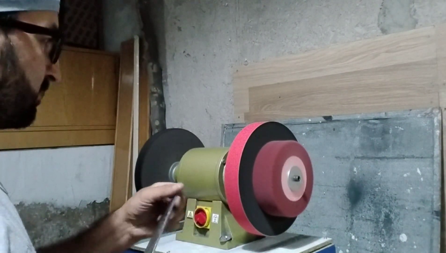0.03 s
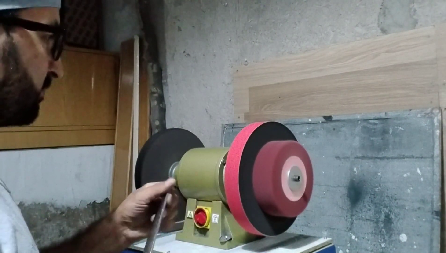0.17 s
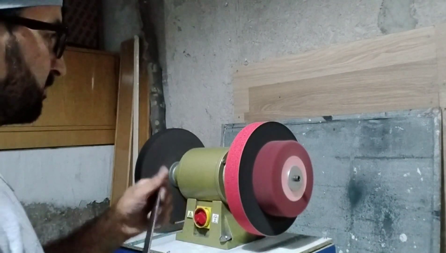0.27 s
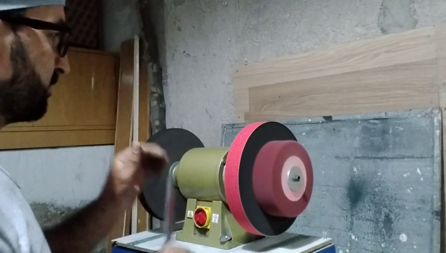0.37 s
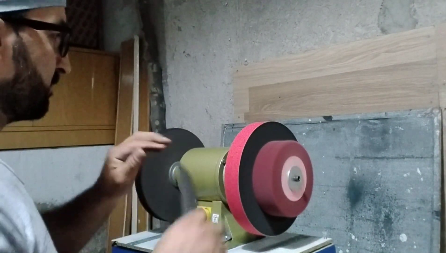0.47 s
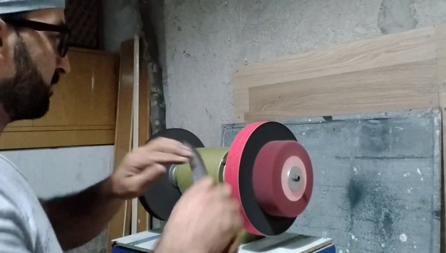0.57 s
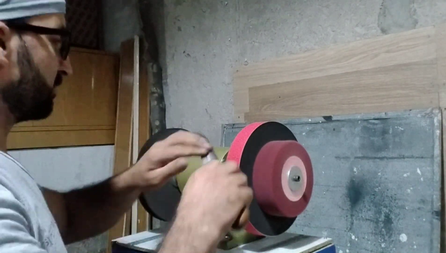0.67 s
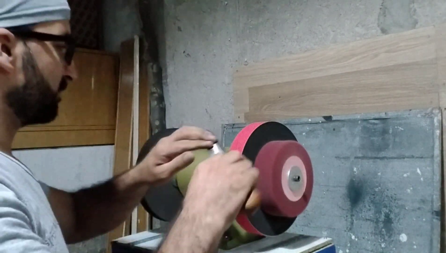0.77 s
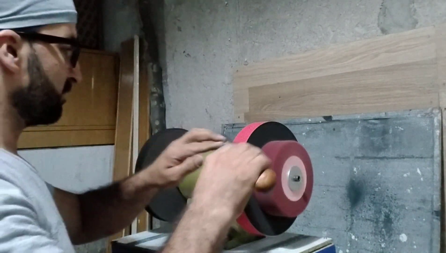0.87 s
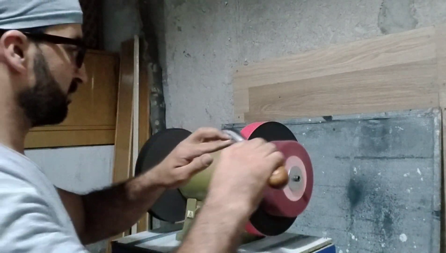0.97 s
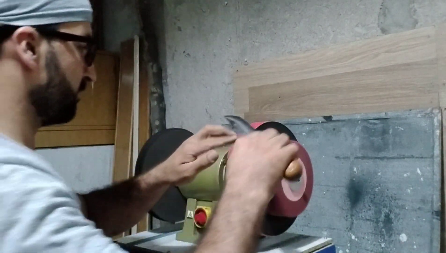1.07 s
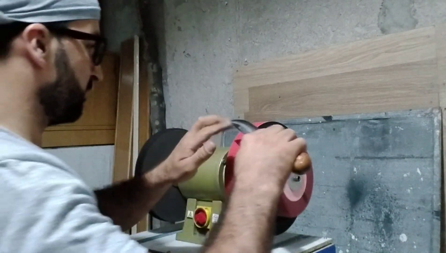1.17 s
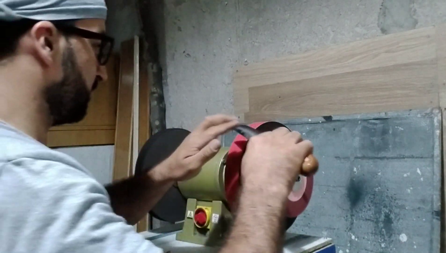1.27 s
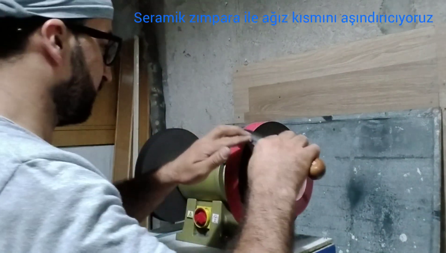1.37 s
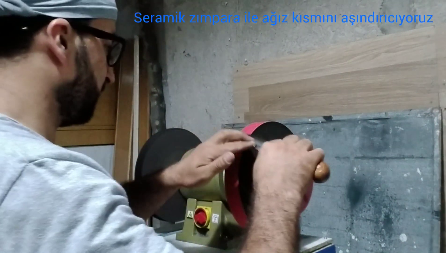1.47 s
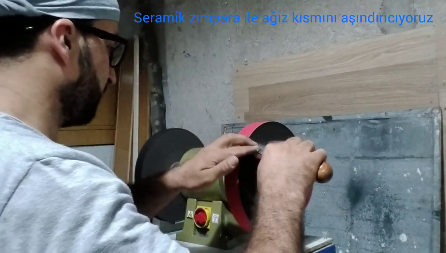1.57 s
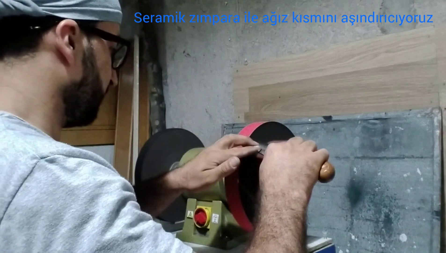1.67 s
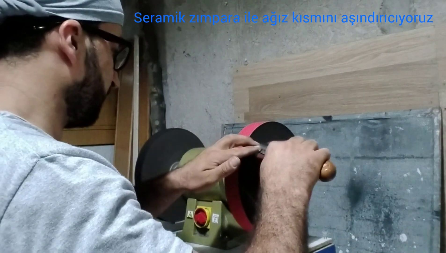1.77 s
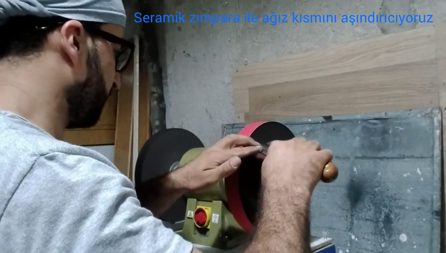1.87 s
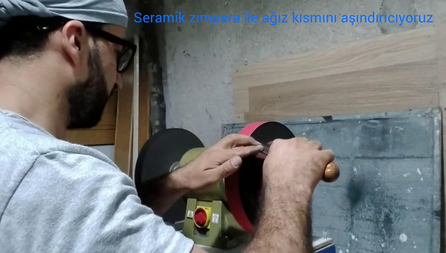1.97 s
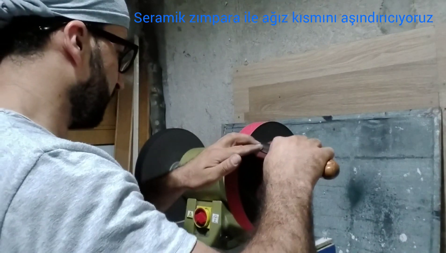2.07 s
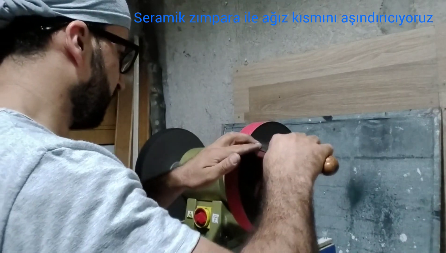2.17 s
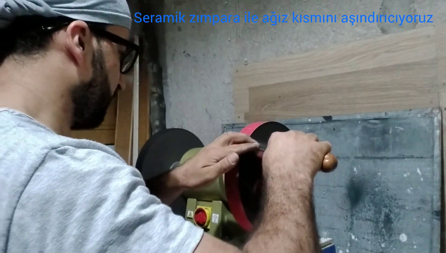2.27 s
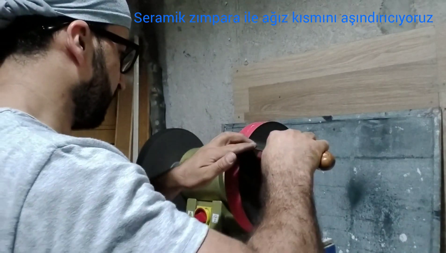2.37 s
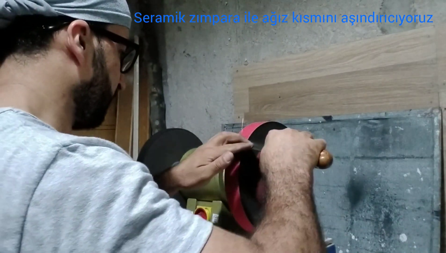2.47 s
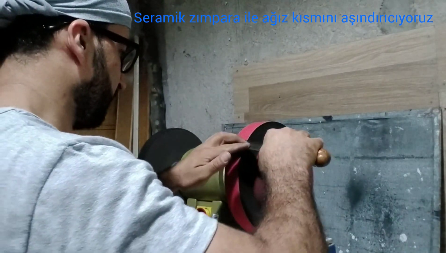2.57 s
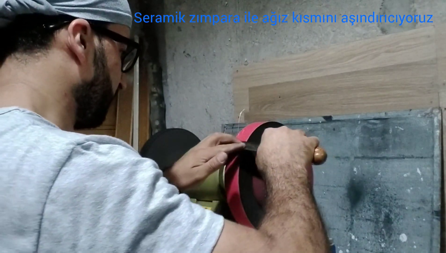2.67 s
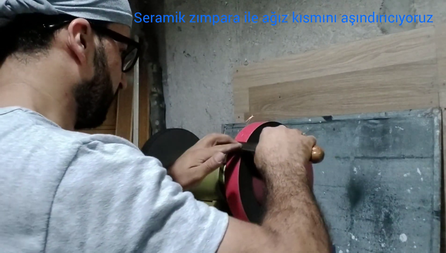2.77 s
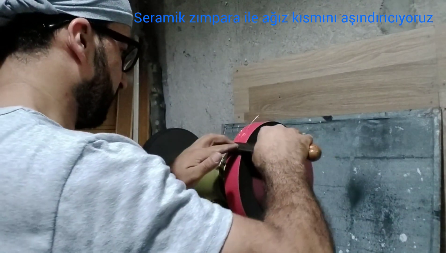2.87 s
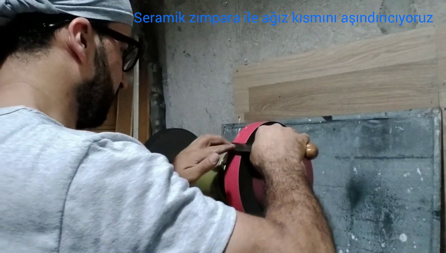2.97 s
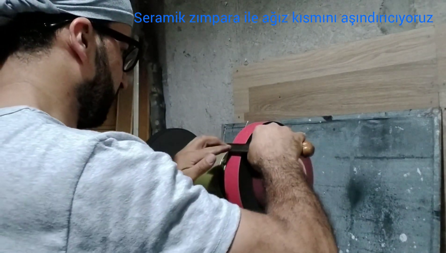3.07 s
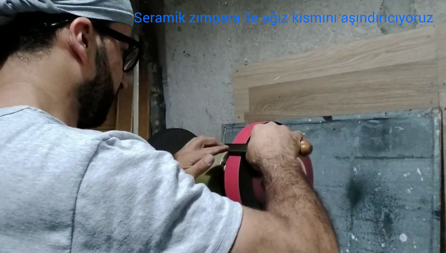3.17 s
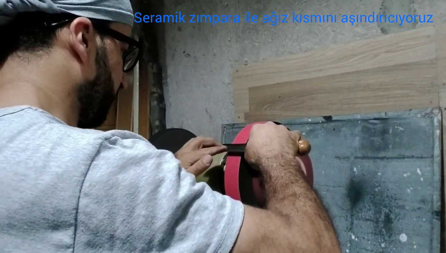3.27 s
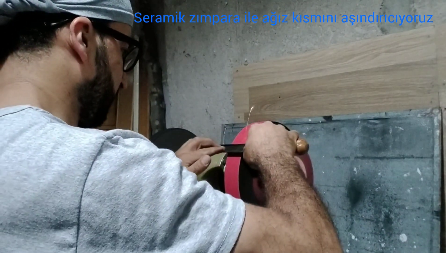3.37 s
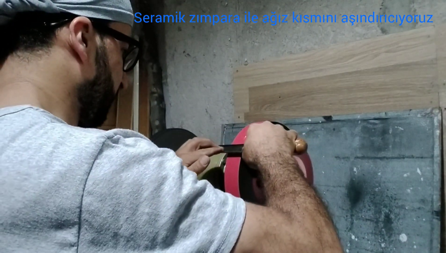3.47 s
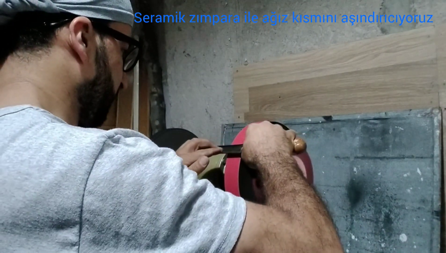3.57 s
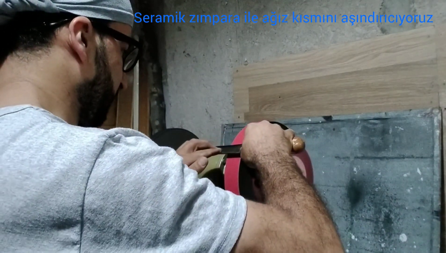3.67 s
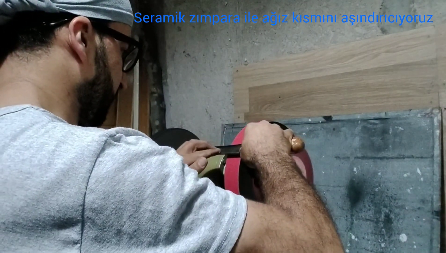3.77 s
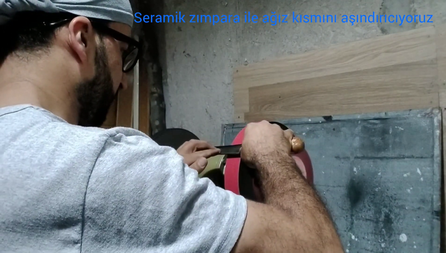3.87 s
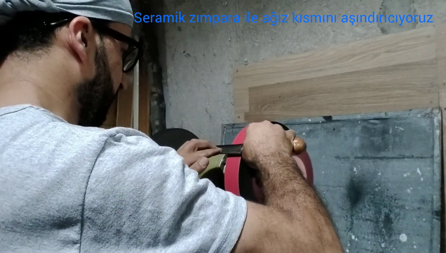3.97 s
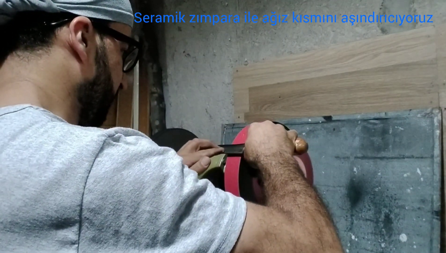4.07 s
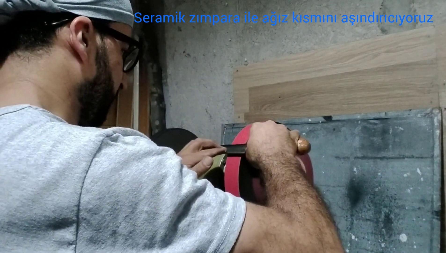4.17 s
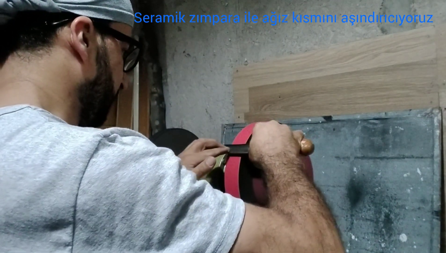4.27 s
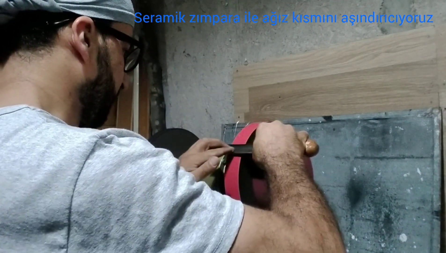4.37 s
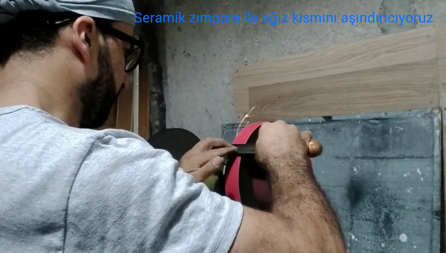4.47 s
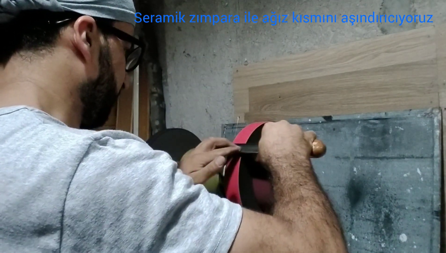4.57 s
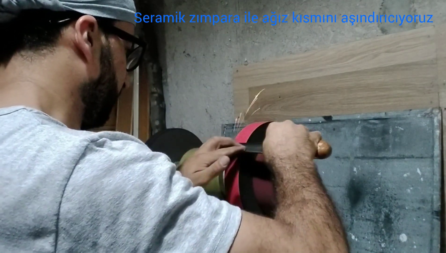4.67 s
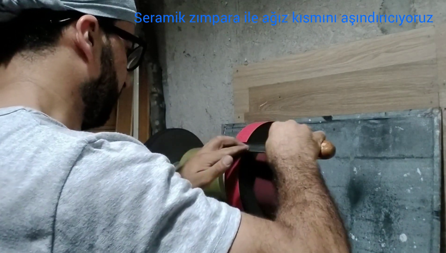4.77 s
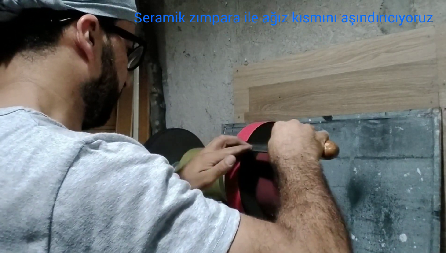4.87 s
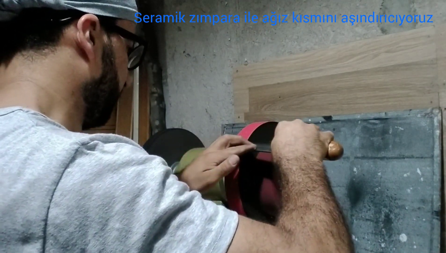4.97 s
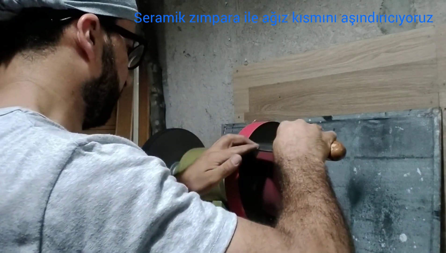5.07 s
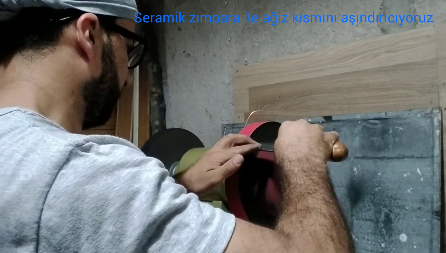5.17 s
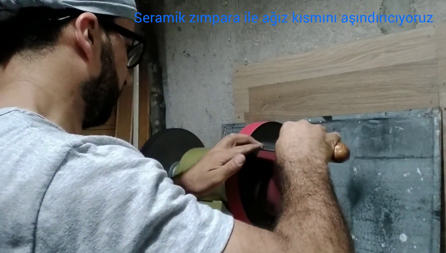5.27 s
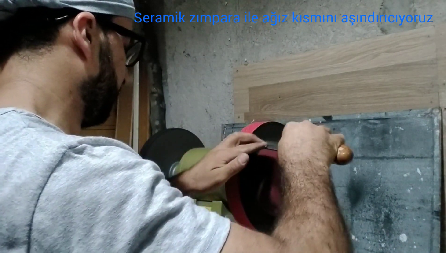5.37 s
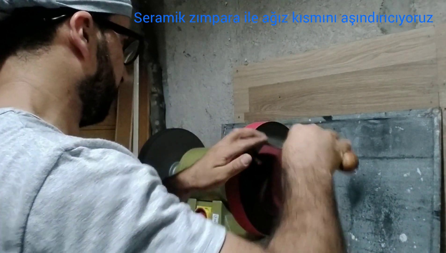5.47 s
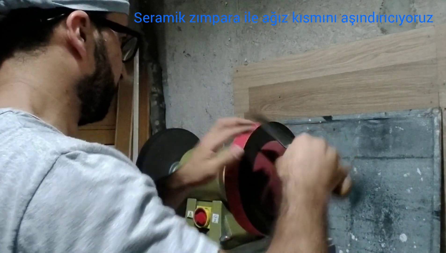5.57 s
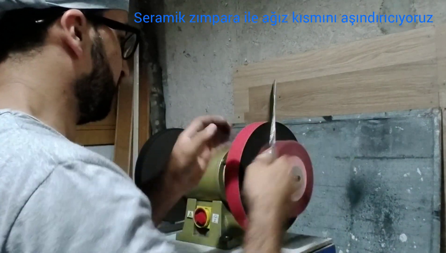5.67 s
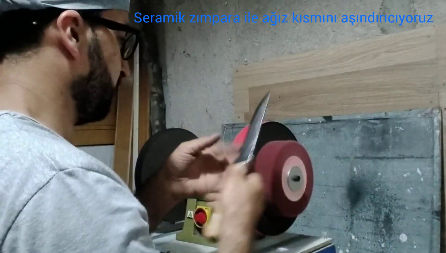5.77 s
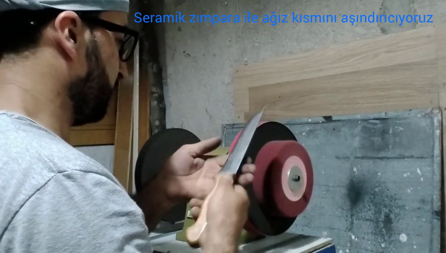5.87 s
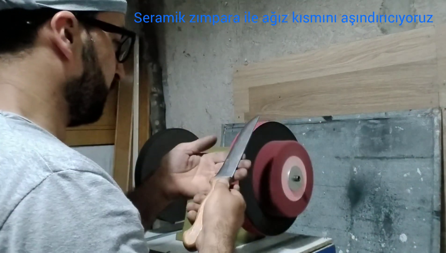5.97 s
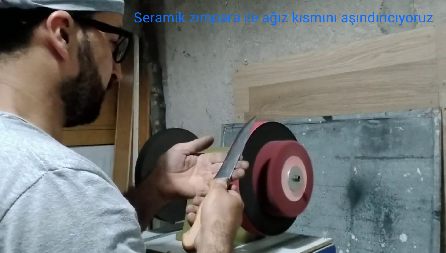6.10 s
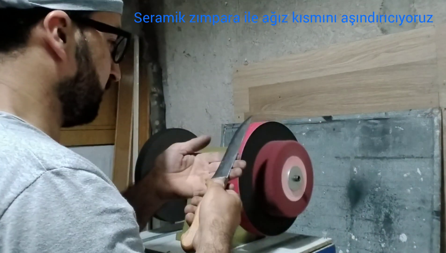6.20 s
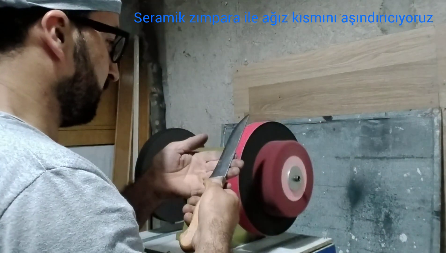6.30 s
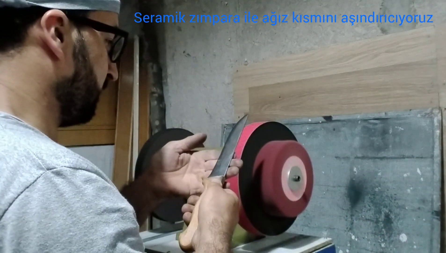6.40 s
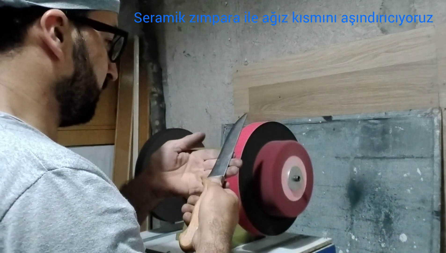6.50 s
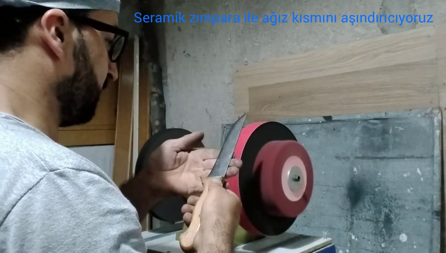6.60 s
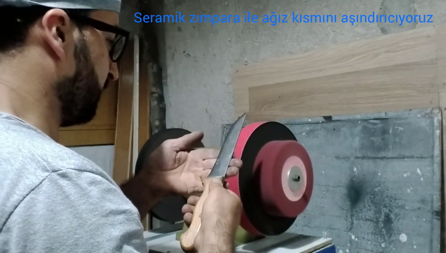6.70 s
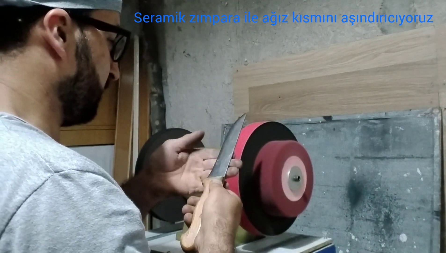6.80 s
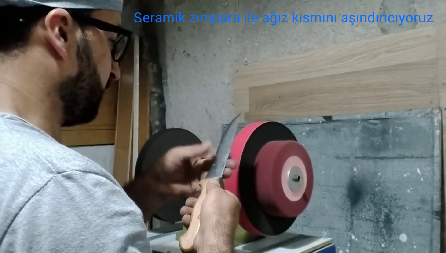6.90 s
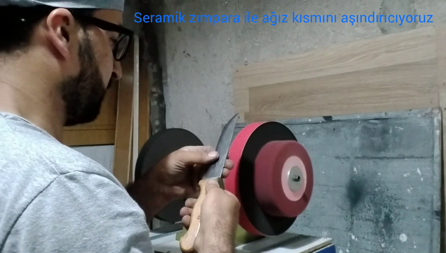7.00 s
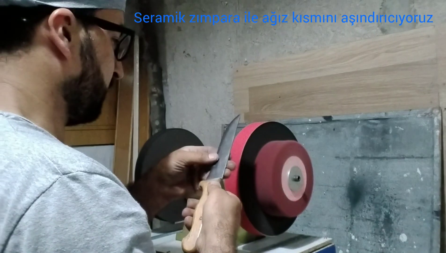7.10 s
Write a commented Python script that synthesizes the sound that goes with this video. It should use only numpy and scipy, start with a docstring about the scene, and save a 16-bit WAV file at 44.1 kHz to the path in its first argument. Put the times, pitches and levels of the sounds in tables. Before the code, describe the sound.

A bench grinder hums and whines steadily; a knife blade chatters onto the wheel, grinds with a loud, buzzing, squealing hiss, then lifts away.

```python
"""Knife on a bench grinder

A bench grinder runs in a small workshop; a knife chatters onto its wheel, is ground for nearly four seconds and lifted.
The same grit passes under the edge on every turn, so the hiss is noise that nearly repeats: a buzzing comb.
The blade rings and squeals in the treble, as noise fed through filters and sharp resonances.
Underneath run motor hum and whine, made of sine waves, and bearing noise and a background hiss, of filtered noise.
"""
import sys
import numpy as np
from scipy import signal
from scipy.fft import irfft
from scipy.io import wavfile
from scipy.ndimage import uniform_filter1d, map_coordinates

SR = 44100
rng = np.random.default_rng(int(sys.argv[2]) if len(sys.argv) > 2 else 0)


def master(y):
    """Save y as 16-bit WAV."""
    cut = np.clip(np.atleast_2d(y).T, -1, 1)
    pcm = np.round(cut * 32767)  # scale
    wavfile.write(sys.argv[1], SR, pcm.astype(np.int16))


N = 314874
TIME = np.arange(N) / SR  # s


def amp(db):
    """Turns decibels into a gain."""
    return 10 ** (np.asarray(db) / 20)


def evened(x):
    """Scales a sound to an rms of 1."""
    return x / np.sqrt(np.mean(x ** 2) + 1e-20)


def read(points, hz):
    """Reads a curve between its points, on a log-frequency axis."""
    f, value = np.transpose(points)
    return np.interp(np.log(hz + 1), np.log(f + 1), value)


def colour(x, points):
    """Filters x to the given spectrum, with unit energy and no sound before its cause (minimum phase)."""
    hz = abs(np.fft.fftfreq(4096, 1 / SR))
    log_gain = np.log(amp(np.maximum(read(points, hz), -100)))
    spectrum = np.exp(np.conj(signal.hilbert(log_gain)))
    taps = np.fft.ifft(spectrum).real[:2048]
    return signal.oaconvolve(x, taps / np.linalg.norm(taps))[:len(x)]


def resonate(x, hz, width):
    """A resonance of gain 1 whose centre may move: shift it down to zero, smooth, shift it back."""
    turn = np.exp(2j * np.pi * np.cumsum(hz * np.ones(len(x))) / SR)
    r = np.exp(-np.pi * width / SR)
    smooth = signal.lfilter([1 - r], [1, -r], x / turn + 1e-18)
    return 2 * (turn * smooth).real


def ring_modes(x, modes):
    """Passes x through a body of dying modes, with unit energy; a wider mode dies sooner."""
    t = TIME[:SR // 5]
    body = 0
    for hz, width, db in modes:
        body = body + amp(db) * width * np.exp(-np.pi * width * t) * np.cos(2 * np.pi * hz * t)
    return signal.oaconvolve(x, body / np.linalg.norm(body))[:N]


def drift(rate):
    """Slow chance of rms 1, taking rate new values a second."""
    points = rng.standard_normal(1024)
    return evened(np.interp(TIME * rate, np.arange(len(points)), points))


# how long the workshop's echo takes to fade by 60 dB: f/Hz, t/s
ROOM_FADE = [(200, 0.059), (4000, 0.31), (8000, 0.24), (15000, 0.089)]


def workshop(x):
    """Near walls answer at once with a short, dense tail, which fades at its own pace at each pitch."""
    length = SR // 2
    echoes = rng.random(length) < 4000 / SR  # about 4000 a second
    taps = rng.standard_normal(length) * echoes * (TIME[:length] > .003)
    hz, t, z = signal.stft(taps, SR, nperseg=256)
    fade_db = -60 * t / read(ROOM_FADE, hz)[:, None]
    tail = signal.istft(z * amp(fade_db), SR, nperseg=256)[1]
    return signal.oaconvolve(x, tail / np.linalg.norm(tail))[:N]


# spectrum of the bearings' rolling noise: f/Hz, relative level/dB per Hz
WHIRR = [(35, -45), (60, -12), (75, -17), (156, -11), (172, -20.5), (783, -23), (1740, -21.5), (4700, -16),
         (7000, -20.5), (9100, -43), (15400, -120)]
# spectrum of the steady background hiss, as the microphone colours it: f/Hz, relative level/dB per Hz
HISS = [(3240, -17), (5500, -14.5), (5800, -8), (5930, 2), (6370, 0), (6810, 2), (7920, 6), (10800, -9.5),
        (13900, -5), (15100, -3), (15900, -1)]
# modes of the housing that the bearings shake: f/Hz, width f/Hz, relative level/dB
HOUSING = [(2910, 110, 14), (4250, 230, -8), (5170, 43, 21), (5630, 35, 25), (5770, 58, -2), (6470, 47, 19),
           (6700, 62, 1)]
# low resonances of the bench under the running motor: f/Hz, width f/Hz, rms level/dB before a slow sway
BENCH = [(272, 180, -67.5), (744, 41, -65.5), (828, 52, -68), (2130, 150, -68)]


def bearings(turns):
    """Rolling noise rings the housing and the bench; a steady hiss lies over it."""
    once_a_turn = 1 + 0.086 * np.cos(2 * np.pi * turns)
    rolling, shaking, noise = rng.standard_normal((3, N)) * once_a_turn
    whirr = amp(-48.5) * colour(rolling, WHIRR)
    housing = amp(-54.5) * ring_modes(shaking, HOUSING)
    bench = sum(amp(db) * evened(resonate(noise, hz, width)) for hz, width, db in BENCH)
    hiss = amp(-45.5) * colour(noise, HISS)
    return (whirr + housing + bench + hiss) * amp(.5 * drift(11))


HIGH_SPOT_S = 2.153  # a moment at which the wheel's high spot meets the blade
# free speed and its loss under a steady full press (turns a second), and the lag of the heavy wheels (s)
IDLE_HZ, SAG_HZ, INERTIA_S = 49.26, .57, .8


def shaft(load):
    """Turns of the wheel, counted from its high spot; the load slowly drags the speed down."""
    keep = np.exp(-1 / (INERTIA_S * SR))
    lagging_load = signal.lfilter([1 - keep], [1, -keep], load)
    turns = np.cumsum(IDLE_HZ - SAG_HZ * lagging_load) / SR
    return turns - np.interp(HIGH_SPOT_S, TIME, turns)


# motor hum that follows the shaft: multiple of its speed, rms level/dB before a slight sway
HUM = [(1, -44.5), (2, -61), (3, -56.5), (4, -71), (5, -79.5), (6, -69.5)]
# magnetic hum of the motor, beating slowly with the shaft's multiples: f/Hz, rms level/dB
MAINS = [(100, -58), (500, -71.5), (600, -71)]
# motor whine: centre f/Hz, relative level/dB
WHINE = [(1120, -64.5), (1825, -62.5), (2530, -65), (2632, -61.5), (2896, -58.5), (3165, -71), (3704, -60),
         (3973, -63), (4156, -61), (4775, -53), (4872, -55.5), (5577, -59.5), (6180, -55.5), (6212, -59)]


def motor(turns):
    """Unbalance hums at multiples of the shaft speed over the mains hum; rough, wavering tones whine above."""
    hum = 0
    for k, db in HUM:
        hum = hum + amp(db + 0.35 * drift(14)) * np.sin(2 * np.pi * (k * turns + rng.random()))
    for hz, db in MAINS:
        hum = hum + amp(db) * np.sin(2 * np.pi * (hz * TIME + rng.random()))
    whine = 0
    for hz, db in WHINE:
        phase = np.cumsum(hz + 4 * drift(60)) / SR
        flutter = 1 + .3 * drift(50)
        whine = whine + amp(db - 4) * flutter * np.sin(2 * np.pi * phase)
    return np.sqrt(2) * (hum + whine)  # a sine's peak is root 2 times its rms


# the wheel thumps against the blade under heavy pressure: middle t/s, level/dB, f/Hz, half-length t/s
THUMPS = [(3.043, -29, 62, 0.025), (4.48, -33, 70, 0.013)]


def thumps():
    """Short low shudders of the wheel and bench: sine waves that swell and fade."""
    total = 0
    for s, db, hz, length in THUMPS:
        swell = np.exp(-((TIME - s) / length) ** 2)
        total = total + amp(db) * swell * np.sin(2 * np.pi * (hz * TIME + rng.random()))
    return total


# a light knock as the knife is brought up: level is relative, width is that of each of two resonances
KNOCK_S, KNOCK_DB, KNOCK_HZ, KNOCK_WIDTH_HZ = 1.0235, -37.5, 1920, 700


def knock():
    """A dull, quickly damped tap: resonant noise that starts at once and dies away."""
    blow = (TIME >= KNOCK_S) * np.exp(-np.maximum(TIME - KNOCK_S, 0) / 0.0085)
    body = resonate(rng.standard_normal(N), KNOCK_HZ, KNOCK_WIDTH_HZ)
    return amp(KNOCK_DB) * blow * evened(resonate(body, KNOCK_HZ, KNOCK_WIDTH_HZ))


# low bending modes of the blade (the bounces ring them too): f/Hz, width f/Hz, relative level/dB
BLADE = [(492, 18, -37), (990, 32, -32.5), (2590, 70, -33.5), (3290, 70, -35.5), (3690, 40, -32),
         (4540, 70, -28), (5080, 140, -34)]


def blade_bending(x):
    """The blade's low modes, damped by the fingers and each kept steadily fed."""
    return sum(amp(db) * evened(resonate(x, hz, width)) for hz, width, db in BLADE)


# the edge bouncing on the wheel: t/s, relative level/dB, time in touch t/s
BOUNCES = [(1.739, -17.5, 0.0085), (1.772, -15.5, 0.01), (1.804, -18.5, 0.014), (1.865, -19.5, 0.011),
           (1.917, -21, 0.0088), (1.955, -20, 0.011), (1.995, -17.5, 0.0065), (2.03, -26, 0.0049),
           (2.069, -20, 0.011)]
# spectrum of each bounce's scrape: f/Hz, relative level/dB per Hz
BOUNCE_COLOUR = [(180, -77), (300, -25), (854, -27), (992, -16), (2130, -37), (2560, -9), (4070, -52),
                 (4350, 0.5), (5310, -8.5), (6480, 6.5), (10700, 2.5), (11800, -5), (15900, 3.5)]
# high modes of the blade, heard when it springs free: f/Hz, width f/Hz, relative level/dB
FREE_BLADE = [(4170, 140, -15), (6410, 45, 7.5), (6800, 54, -17), (8630, 130, 5.5), (9100, 83, -24),
              (10540, 26, 4), (12600, 68, -18), (14500, 40, -7), (14800, 45, 6)]


def bounces():
    """Each bounce is a sharp bite and a brief scrape, after which the blade rings on."""
    scrape = np.zeros(N)
    age = TIME[:SR // 10]
    for s, db, length in BOUNCES:
        touch = np.exp(-(age / length) ** 2)
        bite = .8 * np.exp(-age / .0008)
        trail = .08 * np.exp(-age / .03)
        noise = rng.standard_normal(len(age))
        scrape[round(s * SR):][:len(age)] += amp(db - 1) * (touch + bite + trail) * noise
    high_ring = amp(-6) * ring_modes(scrape, FREE_BLADE)
    low_ring = amp(-22.5) * ring_modes(scrape, BLADE)
    return colour(scrape, BOUNCE_COLOUR) + high_ring + low_ring


# the edge lands and is lifted (s), and how long each takes (s)
LAND_S, LIFT_S = 1.908, 5.564
LAND_RISE_S, LIFT_FALL_S = 0.0065, 0.026
# how hard the blade is pressed, two pushes with a lull between: t/s, level/dB (0 is full pressure)
PRESSURE = [(1.92, -21), (2.16, -16), (2.54, -8), (3.03, -2.5), (3.38, -7), (3.92, -20), (4.25, -7),
            (4.52, 0.5), (4.68, -3), (5.2, -2.5), (5.47, -12), (5.55, -12)]


def hand():
    """The pressure on the blade (dB), and whether it touches the wheel (0-1)."""
    landed = np.clip((TIME - LAND_S) / LAND_RISE_S, 0, 1)
    not_lifted = np.clip((LIFT_S - TIME) / LIFT_FALL_S, 0, 1)
    return np.interp(TIME, *np.transpose(PRESSURE)), landed * not_lifted


# time the edge takes to lie flat and to tilt off again (s), and the level step at a corner (dB)
SEATING_S, TILTING_S, UNSEATED_DB = 0.3, 0.046, -7


def seating():
    """Level change (dB) while only a corner of the edge touches, on landing and on leaving."""
    landing = np.clip(1 - (TIME - LAND_S) / SEATING_S, 0, 1)
    leaving = np.clip(1 - (LIFT_S - TIME) / TILTING_S, 0, 1)
    return UNSEATED_DB * (np.sqrt(landing) + leaving)


def wheel_surface(turns, memory, grit_db=0, size=900):
    """What passes under the edge: a rough track that repeats each turn and slowly changes as the blade slides."""
    shape = (360, size)  # turns, points round the wheel
    grain_db = grit_db * np.minimum(rng.exponential(1, shape), 5)  # a few grains stand out
    fresh = rng.standard_normal(shape) * amp(grain_db)
    keep = np.exp(-1 / memory)  # memory is in turns
    track = signal.lfilter([1], [1, -2 * keep, keep ** 2], fresh, axis=0).ravel()
    return evened(map_coordinates(track, [(turns - turns[0]) * size], order=5, mode="wrap"))


def wheel_bumps(turns, size=900):
    """The wheel's lasting unevenness: a fixed track with every multiple of its speed equally strong."""
    track = irfft(np.exp(2j * np.pi * rng.random(size + 1)))
    return evened(np.interp(turns, np.arange(len(track)) / len(track), track, period=1))


# the high spot's tick: level against the grit (dB), pressure at which it is strongest and its spread (dB),
# and half-length (turns)
TICK_DB, TICK_AT_DB, TICK_SPREAD_DB, TICK_TURNS = -10, -16.5, 4.5, .012


def high_spot(turns):
    """The wheel's high spot clips the edge once a turn, harder on some turns than on others."""
    strength = amp(1.5 * drift(30))
    passing = np.exp(-((turns - np.round(turns)) / TICK_TURNS) ** 2)
    return evened(strength * passing * wheel_surface(turns, memory=2.1))


def shifting_modes(x, patchy_db, size=1024):
    """As the contact travels along the edge it feeds some blade modes and starves others."""
    z = signal.stft(x, nperseg=size)[2].T
    over_time = uniform_filter1d(rng.standard_normal(z.shape), size=36, axis=0)
    field = evened(uniform_filter1d(over_time, size=6, axis=1))  # smooth over time, then over pitch
    return evened(signal.istft((z * amp(patchy_db * field)).T, nperseg=size)[1][:N])


# each part of the grinding: relative level at full pressure (dB), and dB gained per dB of pressure
RASP_DB, RASP_GROWTH = -29.5, 1.0
SCRAPE_DB, SCRAPE_GROWTH = -30, 0.68
RING_DB, RING_GROWTH = -13.5, 0.35
FIZZ_DB, FIZZ_GROWTH = -11, 0.48
BENDING_DB, BENDING_GROWTH = -16.5, 0.028
# the squeal of the contact: centre at full pressure, its rise with pressure, and its wander as the blade slides
SQUEAL_HZ, SQUEAL_HZ_PER_DB, SQUEAL_WANDER_HZ = 8400, 10, 130
# the ring swells and fades as the contact moves along the edge (dB, changes a second)
RING_SWAY_DB, SWAY_RATE = .5, 7
# the blade stays in full contact down to FIRM_DB; THROB_RANGE_DB lower it rides only the wheel's high side
FIRM_DB, THROB_RANGE_DB = -2, 22.5
# once-a-turn throb under a firm hand, and what a light touch adds (natural log of the gain)
CHIP_THROB, CHIP_THROB_LIGHT = .3, 1.0
GRIT_THROB, GRIT_THROB_LIGHT = .08, .32
# spectra of the grinding's rasp, of the scrape between rasp and ring, of its ring and of its fizz:
# each f/Hz, relative level/dB per Hz
RASP = [(25, -10), (70, -2), (130, -2), (218, -2.5), (320, -3), (462, -3), (493, -7), (560, -3),
        (1040, -1.5), (3200, -6.5), (4160, -21.5), (7040, -120)]
SCRAPE = [(1500, -37), (2300, -9), (3000, -9), (4200, 1.5), (5500, 3), (7000, -22.5), (10000, -48)]
RING = [(2350, -35.5), (4000, -26.5), (4680, -17), (5580, -18), (6410, -8), (7050, -8.5), (7820, -2.5),
        (8780, -3.5), (9410, -12.5), (10000, -6.5), (13000, -28), (22000, -120)]
FIZZ = [(5590, -61), (9500, -20), (10200, 4), (11200, -2.5), (15100, 5), (15900, 0)]


def grinding(turns, pressure_db):
    """Grit rasps the steel, rings the blade and fizzes; a light touch throbs with the wheel's high spot."""
    seating_db = seating()
    lightness = np.clip((FIRM_DB - pressure_db) / THROB_RANGE_DB, 0, 1)
    runout = np.cos(2 * np.pi * turns)  # the wheel's high and low side

    # chips tear off almost afresh on each turn, mostly on the wheel's high side unless pressed hard
    chatter = CHIP_THROB + CHIP_THROB_LIGHT * np.sqrt(lightness)
    throb = np.exp(chatter * runout) / np.sqrt(np.i0(2 * chatter))  # the division keeps the mean power
    chips = wheel_surface(turns, memory=0.55, grit_db=2.5) * throb
    tick = high_spot(turns) * np.exp(-((pressure_db - TICK_AT_DB) / TICK_SPREAD_DB) ** 2)

    # the fine grit keeps its pattern for several turns
    swing = (GRIT_THROB + GRIT_THROB_LIGHT * lightness) * runout
    fine_grit = wheel_surface(turns, memory=2.5, grit_db=1.5) * np.exp(swing)
    grit = evened(fine_grit + amp(TICK_DB) * tick)

    # waves in the wheel stiffen and slacken the contact, swinging its squeal a few times a turn
    squeal_hz = SQUEAL_HZ + SQUEAL_HZ_PER_DB * pressure_db + SQUEAL_WANDER_HZ * drift(SWAY_RATE)
    centre = squeal_hz + 420 * wheel_surface(turns, memory=40, size=9) + 500 * lightness * runout
    squeal = evened(resonate(resonate(grit, centre, 1000), centre, 1000))

    ring_db = RING_DB + RING_GROWTH * pressure_db + seating_db + RING_SWAY_DB * drift(SWAY_RATE)
    ring = amp(ring_db) * shifting_modes(colour(grit, RING) + .5 * squeal, patchy_db=2.34)
    fizz_db = FIZZ_DB + FIZZ_GROWTH * pressure_db + seating_db
    fizz = amp(fizz_db) * shifting_modes(colour(grit, FIZZ), patchy_db=2.5)
    tearing = chips + amp(-10) * tick
    rasp = amp(RASP_DB + RASP_GROWTH * pressure_db) * evened(colour(tearing, RASP))
    scrape_db = SCRAPE_DB + SCRAPE_GROWTH * pressure_db + .5 * seating_db
    scrape = amp(scrape_db) * evened(colour(grit + 1.26 * chips, SCRAPE))

    # the lasting bumps of the wheel bend the whole blade
    bending_db = BENDING_DB + BENDING_GROWTH * pressure_db + seating_db
    bending = amp(bending_db) * blade_bending(wheel_bumps(turns) + amp(-8) * chips)
    return rasp + scrape + ring + fizz + bending


def scene():
    """The hand's pressure and one turning shaft drive the grinding; both channels hear the same."""
    pressure_db, touch = hand()
    turns = shaft(touch * amp(pressure_db))
    machine = bearings(turns) + motor(turns) + thumps()
    knife = knock() + bounces() + touch * grinding(turns, pressure_db)
    mono = machine + amp(0.5) * knife + amp(-6.0) * workshop(knife)
    return np.array([mono, mono])


EDGE_HZ = 15850  # the treble ends here


def record(dry):
    """The loudest peaks are rounded off; then the band limit."""
    ceiling = .8
    rounded = dry / (1 + (dry / ceiling) ** 6) ** (1 / 6)
    low_pass = signal.firwin(801, EDGE_HZ, window=("kaiser", 9), fs=SR)
    return signal.oaconvolve(rounded, low_pass[None], "same")


dry = scene()
out = record(dry)
master(out)
```